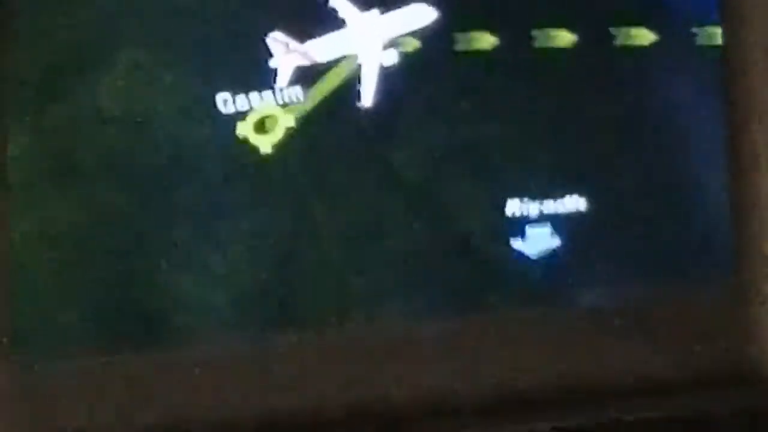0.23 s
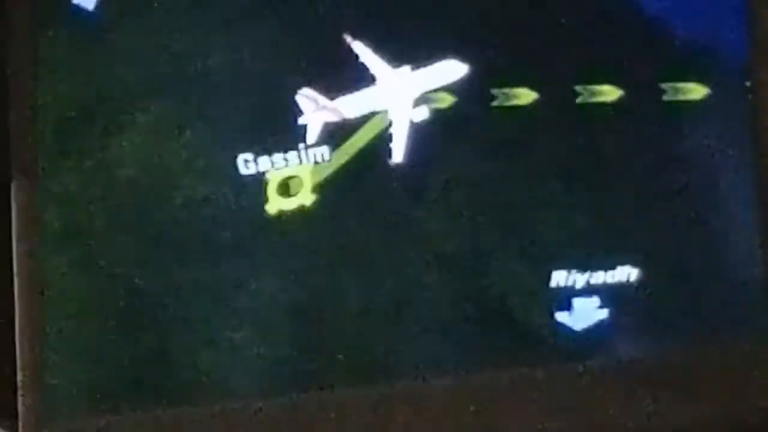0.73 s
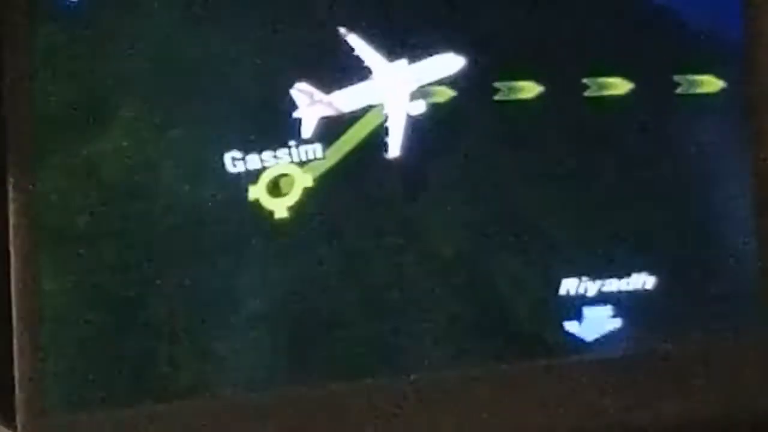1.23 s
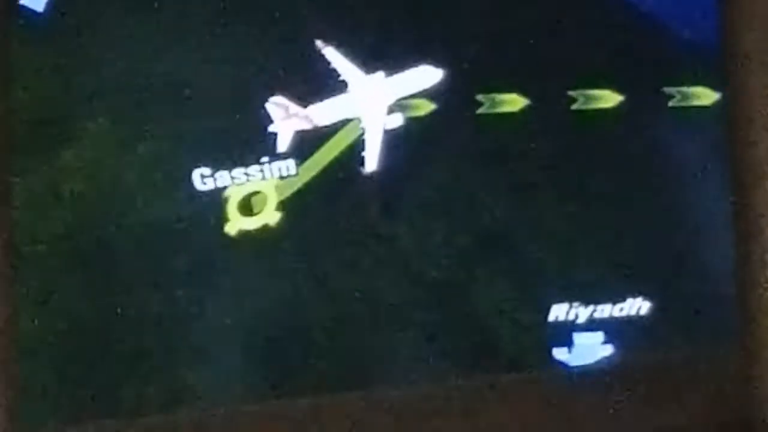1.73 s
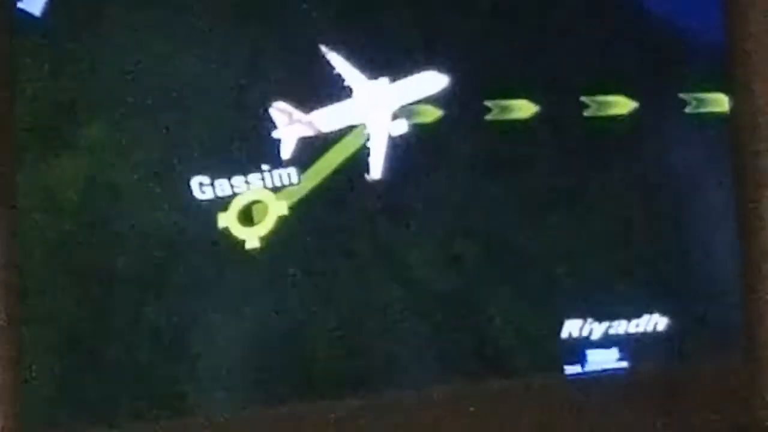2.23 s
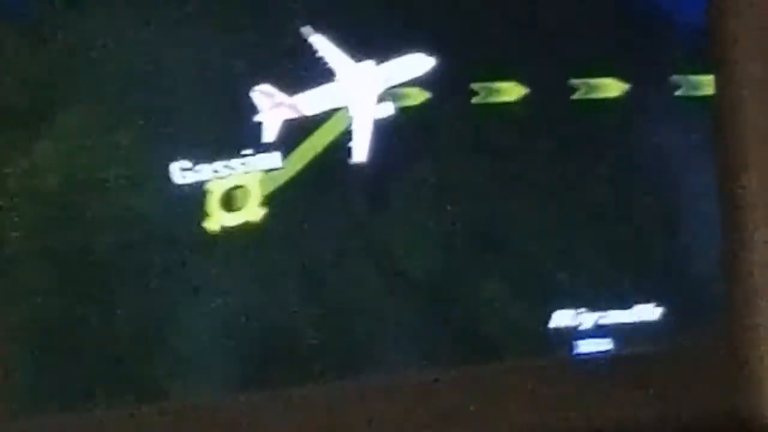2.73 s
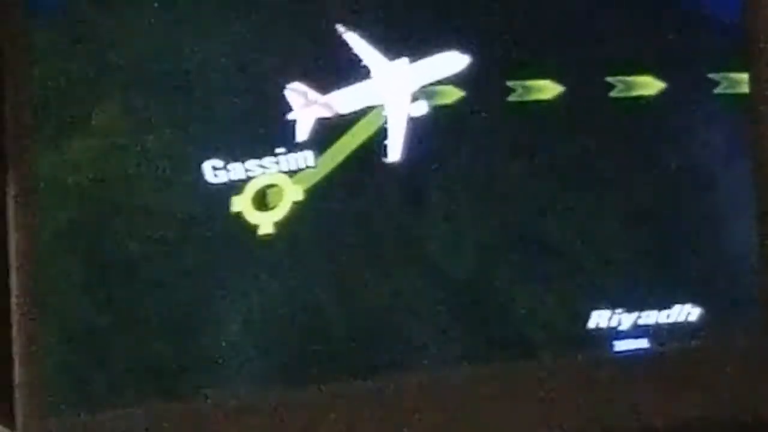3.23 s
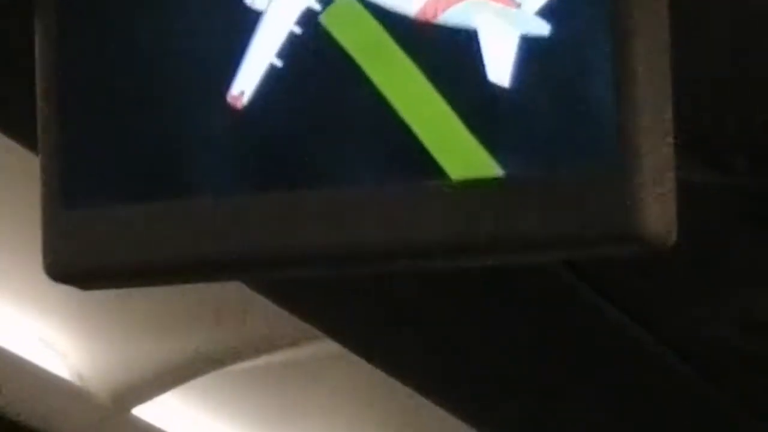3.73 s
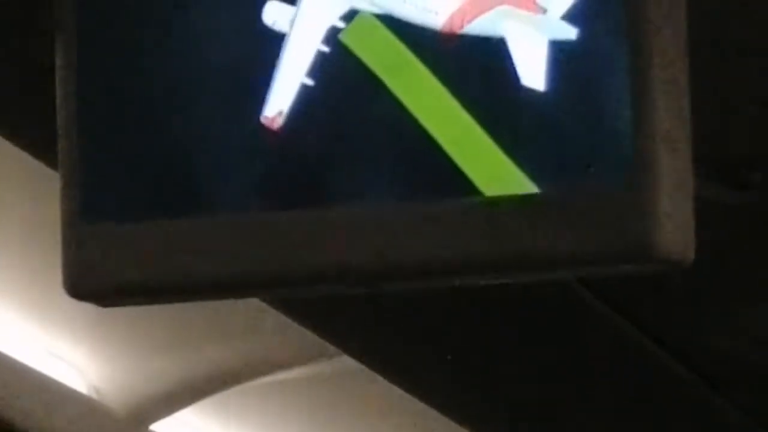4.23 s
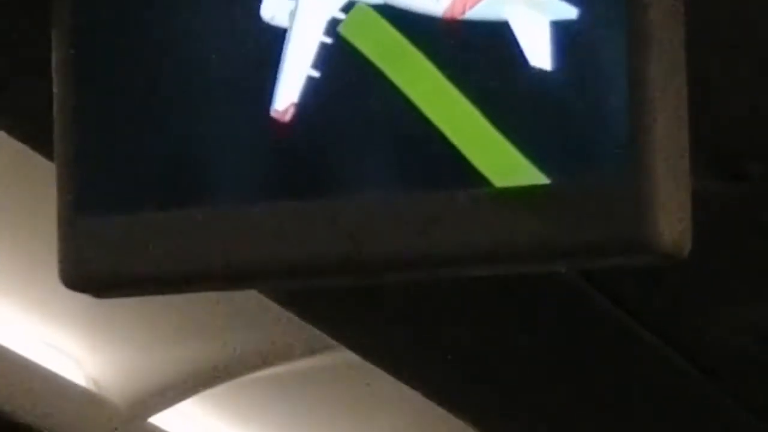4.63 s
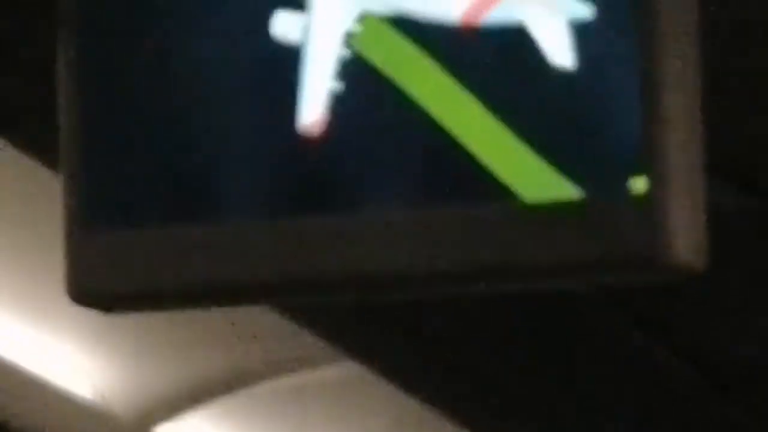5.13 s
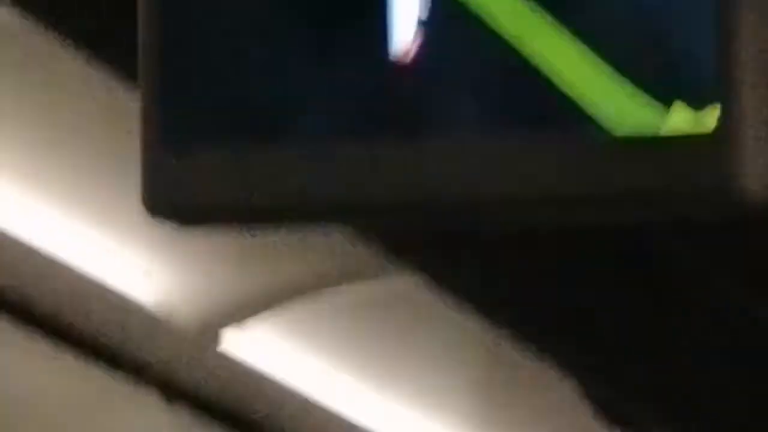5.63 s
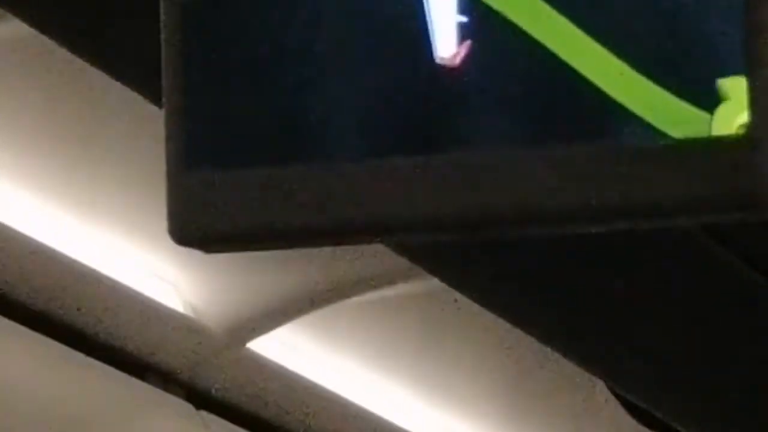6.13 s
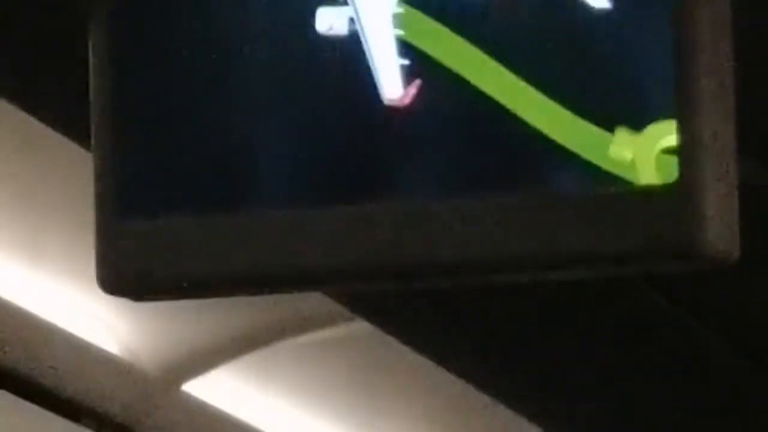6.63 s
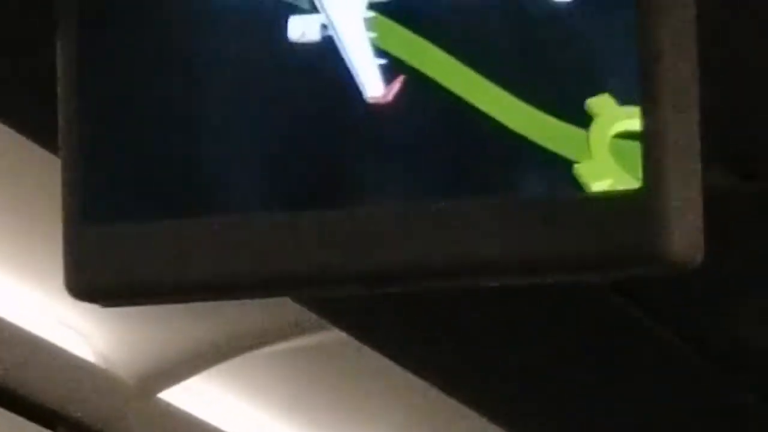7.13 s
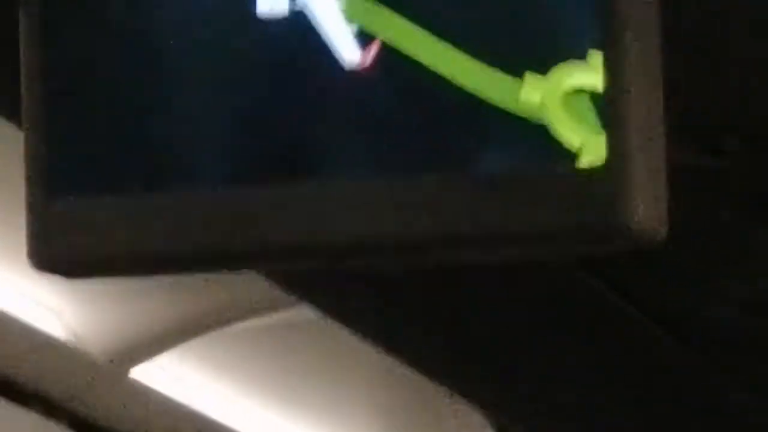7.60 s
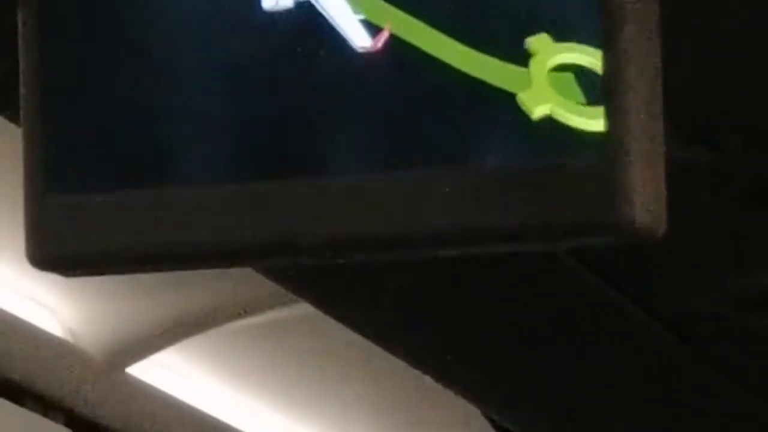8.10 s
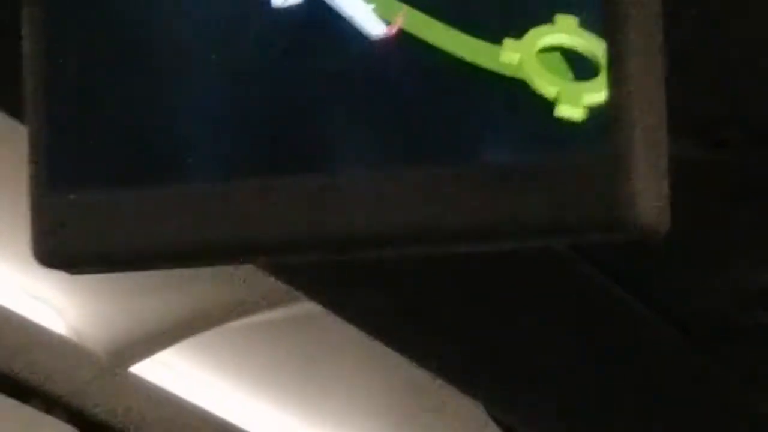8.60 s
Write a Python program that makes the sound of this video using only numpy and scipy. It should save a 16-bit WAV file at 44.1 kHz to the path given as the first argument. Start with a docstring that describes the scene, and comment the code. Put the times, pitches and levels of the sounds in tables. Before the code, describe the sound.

Bass-heavy cabin noise from a jet in flight, wide and steady, with low engine hum and a barely present thin whine. It opens with crackling skin-on-case handling noise close to the microphone. After a sharp click comes total silence for half a second; the rumble then resumes weak in bass and pipe-like, grows full, and continues with a few faint light plastic ticks and one soft brush.

```python
"""Inside a cruising airliner, heard by a hand-held stereo microphone: noise shaped by cabin resonances is the
roar of air along the fuselage, and wavering sines are the engine drone. At the start a finger brushes the case
in crackling friction bursts. At 3.33 s the sound snaps off; after 0.45 s of silence it returns from a second
spot, weaker and doubled by a late copy, so briefly hollow, then swells to full. From the return at 3.78 s until
7 s something plastic ticks now and then, in short band-passed bursts; later the finger brushes again, faintly."""
import sys
import numpy as np
from scipy import signal
from scipy.fft import rfft, irfft
from scipy.io import wavfile

SR = 44100
rng = np.random.default_rng(int(sys.argv[2]) if len(sys.argv) > 2 else 0)


def dump(signal):
    """Clip the signal to [-1, 1] and save it as 16-bit WAV at the path in sys.argv[1]."""
    limited = np.clip(np.atleast_2d(signal).T, -1, 1)
    pcm = np.round(limited * 32767).astype(np.int16)
    wavfile.write(sys.argv[1], SR, pcm)


N = 390726
TIME = np.arange(N) / SR
FREQS = np.maximum(np.fft.rfftfreq(N, 1 / SR), 1)
PAUSE_FROM_S, PAUSE_TO_S = 3.330, 3.780

# broad roar at each spot, before resonances: freq_hz [Hz], level_db [dB per Hz]
ROAR_FIRST_SPOT = [(20, -64), (50, -44), (100, -38), (150, -40), (195, -44.5), (350, -50), (430, -55.5),
                   (630, -63.5), (850, -63), (1150, -62.5), (1600, -70.5), (2500, -79.5), (3400, -87),
                   (7000, -92.5), (9500, -99), (11500, -106.2), (15000, -117.5)]
ROAR_SECOND_SPOT = [(20, -55), (50, -48), (100, -37), (150, -42.5), (195, -45), (350, -50.5), (430, -59.5),
                    (900, -64.5), (1150, -63.5), (1600, -71), (2500, -79), (3400, -86.5), (7000, -92.5),
                    (11500, -105.6), (15000, -119)]
# standing waves favour one port: freq_hz [Hz], left_minus_right_db [dB]
LEAN_FIRST_SPOT = [(60, -3.5), (130, 1), (185, -6.5), (310, 2.5), (430, -3), (660, 5.5), (1100, -2.5),
                   (1900, 0.5), (2450, -4), (3400, 0), (8800, -2.5), (11200, 7), (14000, -1)]
LEAN_SECOND_SPOT = [(70, -4), (140, -2), (185, -2), (310, 1.5), (400, -4.5), (570, 8.5), (780, 1),
                    (950, -0.6), (1900, -4.5), (2200, -7), (4200, -2), (8800, -6.5), (11000, 5), (13000, 1)]
# cabin and port resonances: freq_hz [Hz], width_hz [Hz], boost_db [dB]
CABIN_RESONANCES = [(55, 11, 2), (80.5, 13, -4), (142, 22, 1.5), (218, 18, -1.5), (238.2, 11, 4.5),
                    (297, 19.7, 6.5), (488.3, 27, 5.5), (700, 40, 4.5), (896, 98, 4), (1220, 76, 0.5),
                    (1315, 110, 0), (1830, 200, -3), (2640, 330, 2.5), (4250, 400, 5), (8150, 400, -3.5),
                    (9300, 900, 2), (9900, 500, -3)]
# power share straight from the left-hand wall: freq_hz [Hz], share [0-1]
WALL_SHARE = [(150, 0.02), (400, 0.12), (700, 0.28), (1100, 0.21), (1800, 0.24), (3200, 0.2), (7000, .07),
              (14000, 0)]
# likeness of the remaining roar at the two ports: freq_hz [Hz], correlation [-1 to 1]
PORT_CORRELATION = [(25, 0.9), (50, .94), (100, 0.91), (140, 0.94), (185, 0.61), (235, 0.93), (260, 0.54),
                    (305, 0.89), (400, 0.45), (490, 0.54), (650, 0.56), (900, 0.32), (1400, -0.36),
                    (3000, -0.035)]


def airflow(roar, lean, lag_ms, lowest_hz=24):
    """Turbulence shakes the fuselage skin; its noise fills the cabin and reaches two ports."""
    level_db = over_hz(roar)
    for freq_hz, width_hz, boost_db in CABIN_RESONANCES:
        level_db = level_db + boost_db / (1 + (2 * (FREQS - freq_hz) / width_hz) ** 2)
    # the ports barely sense the slowest pressure waves
    colour = from_db(level_db) / np.hypot(1, (lowest_hz / FREQS) ** 2)
    # sound from all round: a part alike at both ports, a part opposite
    correlation = over_hz(PORT_CORRELATION)
    common = np.sqrt((1 + correlation) / 2) * white()
    opposed = np.sqrt((1 - correlation) / 2) * white() * [[1], [-1]]
    diffuse = common + opposed
    # sound from the wall reaches the right port late
    lag_s = np.array([[0], [lag_ms / 1000]])
    direct = white() * np.exp(-2j * np.pi * FREQS * lag_s)
    share = over_hz(WALL_SHARE)
    field = np.sqrt(share) * direct + np.sqrt(1 - share) * diffuse
    return irfft(field * colour * panned(over_hz(lean)), N)


# steady engine tones: freq_hz [Hz], level_db [dB rms, before wavering and spot gain], waver [0-1]
ENGINE_TONES = [(75.1, -23.2, .05), (236.5, -41, .3), (2702, -67, .4)]
HUM_RETURN_DB, HUM_HOLD_S, HUM_RISE_S = -6, 0.29, 0.53


def engines(lean_db, first_db, second_db):
    """Fan and core shafts shake the cabin once a turn in a steady drone; a thin whine sits above."""
    tones = 0
    for freq_hz, level_db, waver in ENGINE_TONES:
        # complex, so both strength and phase waver
        swell = 1 + waver * (drift(9.7) + 1j * drift(5.9)) / np.sqrt(2)
        turning = np.exp(2j * np.pi * (freq_hz * TIME + rng.random()))
        tones = tones + np.sqrt(2) * from_db(level_db) * np.real(swell * turning)
    weakness = 1 - ramp(PAUSE_TO_S + HUM_HOLD_S, HUM_RISE_S)
    returning_db = second_db + HUM_RETURN_DB * weakness
    spot_db = np.where(TIME < PAUSE_TO_S, first_db, returning_db)
    return tones * from_db(spot_db) * panned(lean_db)


# finger slips: middle_s [s], half_length_s [s], level_db [dB per Hz before colour], ring_db [dB, case ring]
FINGER_SLIPS = [(0.012, 0.0055, -84.5, -11), (.074, .005, -89, -10), (0.112, 0.0075, -82, -8),
                (0.153, .003, -80.5, -12), (0.164, .0045, -74.5, -10.5), (0.175, .004, -75, -10.5),
                (0.197, 0.0072, -75, -1), (0.219, 0.0073, -71.5, -1.5), (0.243, 0.0079, -75.5, -2),
                (0.251, 0.0023, -76.5, 7.5), (7.635, 0.074, -95.5, -11.5)]
# strong modes of the case: freq_hz [Hz], width_hz [Hz], gain_db [dB]
STRONG_CASE_MODES = [(1100, 400, 4), (1850, 350, 2), (2400, 130, 9), (5500, 250, 3)]
# colour of the rubbing: freq_hz [Hz], gain_db [dB]
RUB_COLOUR = [(400, -5), (1500, 1.5), (3600, 2.5), (4500, 0.5), (6000, 1.5), (7200, 3), (8200, -2),
              (9200, 0.5), (11500, -1.5), (13200, -11.5), (15000, -13)]
# unequal reach of the rubbing: freq_hz [Hz], left_minus_right_db [dB]
RUB_PORT_LEAN = [(2400, -2), (3600, 1.5), (5500, -1), (8000, -3), (12000, 5.5), (14000, 0)]
# slips much longer than CONTACT_S glide over many points of the case and lose their colour
CONTACT_S, CASE_T60_S = .011, .012


def finger(case_lean_db):
    """Skin drags over the case in uneven, crackling slips, each coloured anew; firm ones ring its modes."""
    skin = np.array([crackle(), crackle()])
    friction = ringing = 0
    for middle_s, half_length_s, level_db, ring_db in FINGER_SLIPS:
        swell = from_db(level_db) / (1 + ((TIME - middle_s) / half_length_s) ** 2)
        stays = 1 / (1 + (half_length_s / CONTACT_S) ** 2)
        coloured = case_ring(skin * swell, CASE_T60_S)
        friction = friction + np.sqrt(stays) * coloured + np.sqrt(1 - stays) * skin * swell
        ringing = np.hypot(ringing, swell * from_db(ring_db))
    case = 0
    for k, (freq_hz, width_hz, gain_db) in enumerate(STRONG_CASE_MODES):
        detuning = (FREQS ** 2 - freq_hz ** 2) / (FREQS * width_hz)
        case = case + (-1) ** k * from_db(gain_db) / (1 + 1j * detuning)
    rub = from_db(over_hz(RUB_COLOUR)) * panned(over_hz(RUB_PORT_LEAN))
    rubbed = rfft(friction) * rub
    rung = rfft(crackle() * ringing) * case * panned(case_lean_db)
    return irfft(rubbed + rung, N)


CRACKLES_PER_S, CRACKLE_SHARE = 1100, .55  # share of the friction power


def crackle():
    """Friction noise of 0 dB per Hz: tiny catches of the skin at uneven gaps, over a fine hiss."""
    catches = rng.standard_normal(N) * (rng.random(N) < CRACKLES_PER_S / SR)
    catches = np.sqrt(SR / 2) * catches / catches.std()
    hiss = irfft(white(), N)
    return np.sqrt(CRACKLE_SHARE) * catches + np.sqrt(1 - CRACKLE_SHARE) * hiss


def case_ring(x, t60_s):
    """Many small case modes as decaying noise, a new mix for each contact and port; keeps the level."""
    age_s = TIME[:SR // 20]
    response = rng.standard_normal((2, len(age_s))) * from_db(-60 * age_s / t60_s)
    response = response / np.linalg.norm(response, axis=1, keepdims=True)
    return signal.oaconvolve(x, response, axes=1)[:, :N]


# plastic ticks: start_s [s], level_db [dB peak before dulling and panning], ring_hz [Hz],
# half_width [share of ring_hz], t60_s [s]
PLASTIC_TICKS = [(3.785, -49, 11200, .12, .11), (3.848, -47, 10800, .1, .08), (4.062, -37, 4900, .25, .09),
                 (4.768, -46, 8000, 0.37, .07), (5.137, -38, 4270, .2, .06),
                 (6.9369, -28, 10700, .55, 0.0018), (6.9381, -39, 11800, .12, .005),
                 (6.9413, -45, 12500, .1, .006), (6.9445, -33, 5800, 0.054, 0.0092),
                 (6.9497, -38, 8800, .5, .007), (6.9583, -37, 6200, .15, .005), (6.999, -48, 9500, .3, .05)]


def ticks(lean_db, top_hz=13000):
    """Each tick is a noise burst that starts at once and dies in one band; the plastic dulls the top."""
    out = np.zeros((2, N))
    age_s = TIME[:SR // 10]
    for start_s, level_db, ring_hz, half_width, t60_s in PLASTIC_TICKS:
        edges_hz = [ring_hz / (1 + half_width), ring_hz * (1 + half_width)]
        band = signal.butter(2, edges_hz, "band", fs=SR, output="sos")
        burst = rng.standard_normal((2, len(age_s))) * from_db(-60 * age_s / t60_s)
        tick = signal.sosfilt(band, burst)
        at = round(start_s * SR)
        out[:, at:at + len(age_s)] += from_db(level_db) * tick / np.abs(tick).max()
    dull = signal.butter(2, top_hz, fs=SR, output="sos")
    return signal.sosfilt(dull, out) * panned(lean_db)


def snap(level_db, fall_hz):
    """The sharp click with which the sound breaks off: a step that decays exponentially."""
    age_s = TIME - PAUSE_FROM_S
    return from_db(level_db) * (age_s >= 0) * np.exp(-2 * np.pi * fall_hz * np.abs(age_s))


HOLLOW_DELAY_S, HOLLOW_LENGTH_S = .02, 1.08


def hollow(x):
    """A late copy hands over to the prompt sound; while they overlap the roar rings as in a pipe."""
    late = np.pad(x, ((0, 0), (round(HOLLOW_DELAY_S * SR), 0)))[:, :N]
    prompt = ramp(PAUSE_TO_S, HOLLOW_LENGTH_S)
    return (1 - prompt) * late + prompt * x


def from_db(db):
    """Decibels to gain."""
    return 10 ** (np.asarray(db) / 20)


def over_hz(points):
    """A spectrum table at every frequency, joined on a log axis."""
    freq_hz, value = np.transpose(points)
    return np.interp(np.log(FREQS), np.log(freq_hz), value)


def white():
    """Spectrum of white noise of 0 dB per Hz."""
    real, imag = rng.standard_normal((2, len(FREQS)))
    return (real + 1j * imag) * np.sqrt(N * SR) / 2


def drift(rate_hz):
    """Slow random curve of spread 1, with a new target rate_hz times a second."""
    knots = rng.standard_normal(int(N / SR * rate_hz) + 2)
    slow = np.interp(TIME * rate_hz, np.arange(len(knots)), knots)
    return slow / slow.std()


def panned(lean_db):
    """Left and right gains for a left-minus-right level difference."""
    return from_db(np.array([[.5], [-.5]]) * lean_db)


def ramp(start_s, length_s):
    """0 until the start, then straight up to 1."""
    return np.clip((TIME - start_s) / length_s, 0, 1)


def scene():
    """The roar of each spot in turn, with the engines and the small sounds on top."""
    first = airflow(ROAR_FIRST_SPOT, LEAN_FIRST_SPOT, lag_ms=.455)
    second = airflow(ROAR_SECOND_SPOT, LEAN_SECOND_SPOT, lag_ms=0.4)
    roar = np.where(TIME < PAUSE_TO_S, first, second)
    drone = engines(lean_db=-1.5, first_db=1, second_db=-1.7)
    return roar + drone + finger(case_lean_db=-9) + ticks(lean_db=-6)


# each hold starts at the end of the pause, its rise follows the hold; the bass gain adds to the overall one
RETURN_DB, FULL_DB, RETURN_HOLD_S, RETURN_RISE_S = -0.5, 1.5, 0.93, 0.37
BASS_RETURN_DB, BASS_HOLD_S, BASS_RISE_S = -7, 0.44, 0.25
CUTOFF_HZ = 15200


def record(dry, bass_hz=100):
    """The sound snaps off, then returns thin and hollow and swells to full; the top is cut."""
    level_db = RETURN_DB + (FULL_DB - RETURN_DB) * ramp(PAUSE_TO_S + RETURN_HOLD_S, RETURN_RISE_S)
    bass_db = BASS_RETURN_DB * (1 - ramp(PAUSE_TO_S + BASS_HOLD_S, BASS_RISE_S))
    doubled = hollow(dry)
    bass = signal.sosfiltfilt(signal.butter(4, bass_hz, fs=SR, output="sos"), doubled)
    returning = from_db(level_db) * (doubled - bass + from_db(bass_db) * bass)
    closing = np.clip((PAUSE_FROM_S - TIME) / .001, 0, 1)
    opening = ramp(PAUSE_TO_S, .004)
    heard = dry * closing + snap(level_db=-15.5, fall_hz=801) + returning * opening
    top_cut = signal.ellip(10, .1, 80, CUTOFF_HZ, fs=SR, output="sos")
    return signal.sosfilt(top_cut, heard)


dry = scene()
out = record(dry)
dump(out)
```